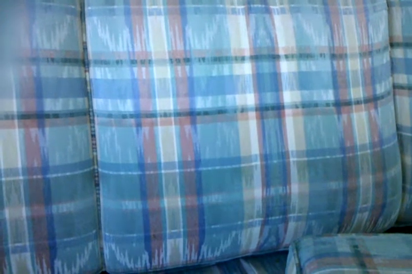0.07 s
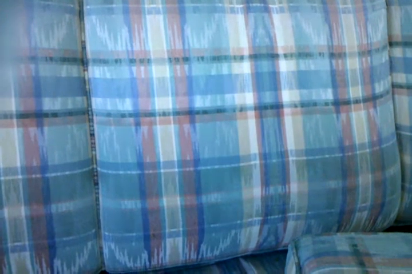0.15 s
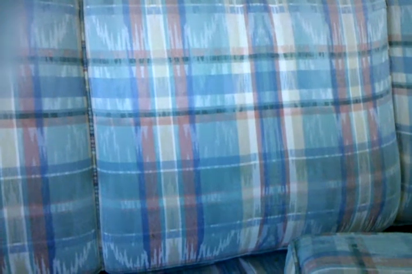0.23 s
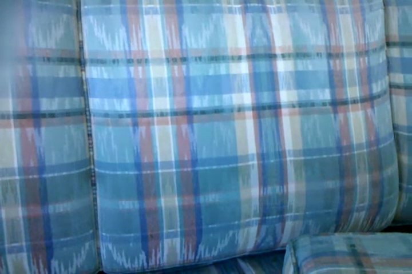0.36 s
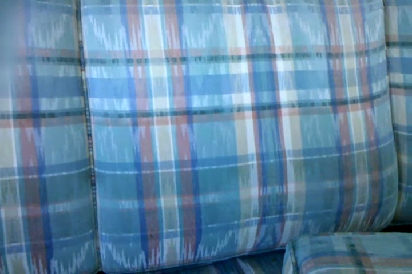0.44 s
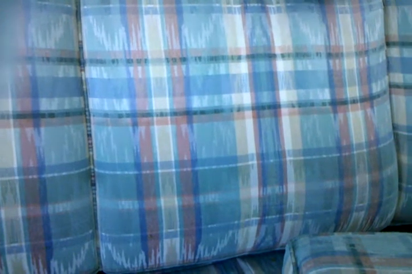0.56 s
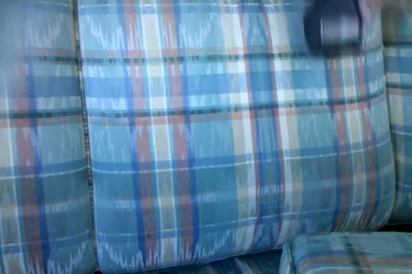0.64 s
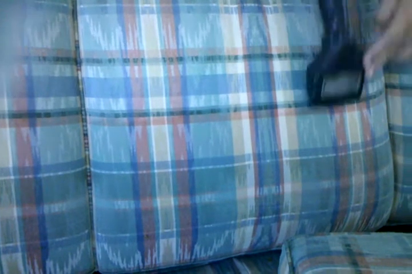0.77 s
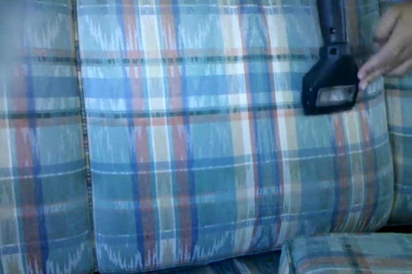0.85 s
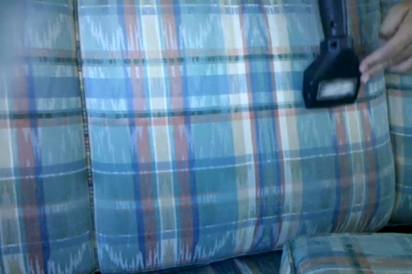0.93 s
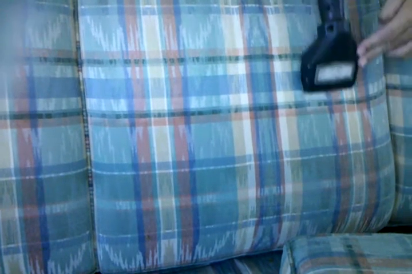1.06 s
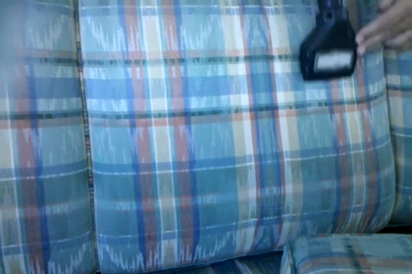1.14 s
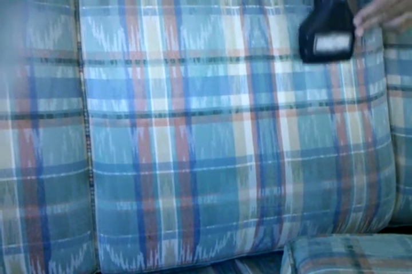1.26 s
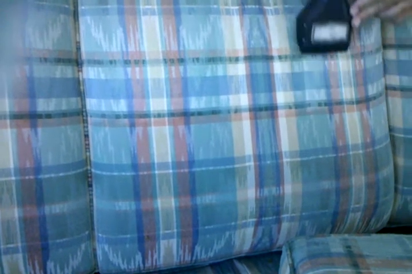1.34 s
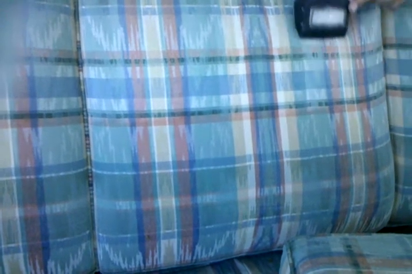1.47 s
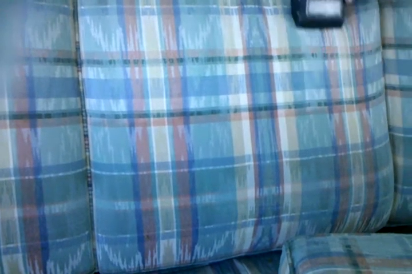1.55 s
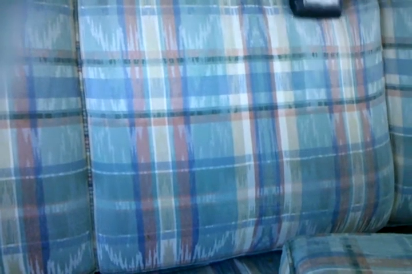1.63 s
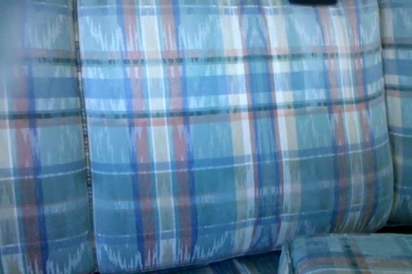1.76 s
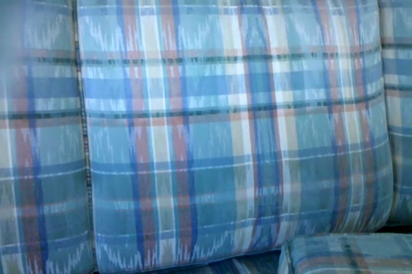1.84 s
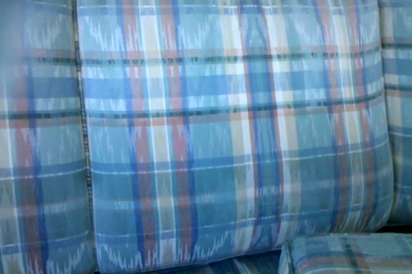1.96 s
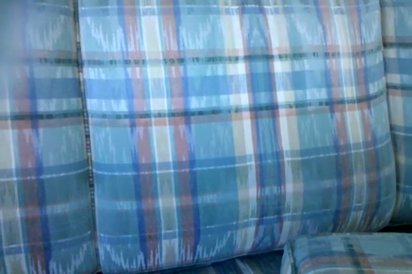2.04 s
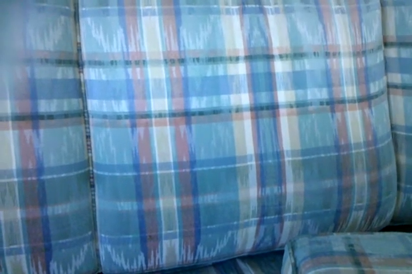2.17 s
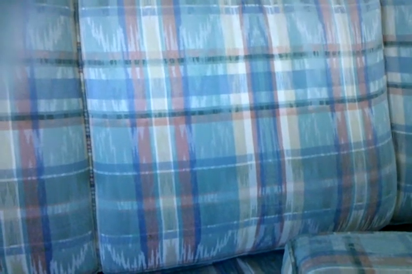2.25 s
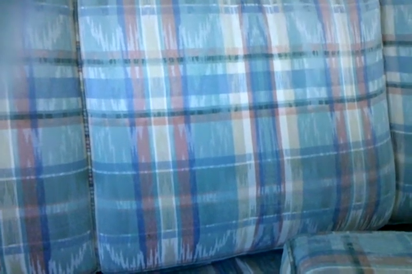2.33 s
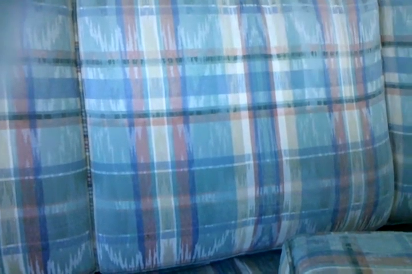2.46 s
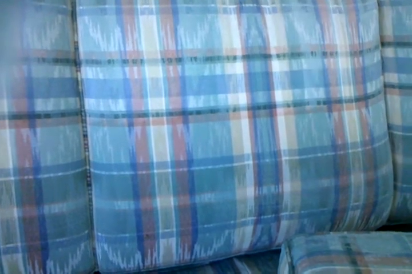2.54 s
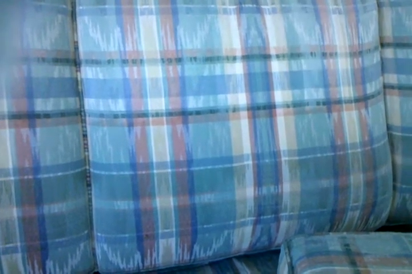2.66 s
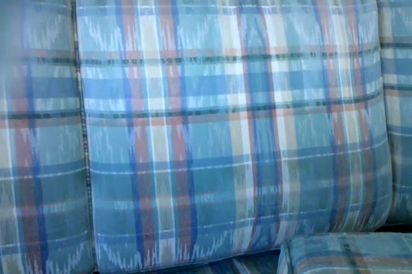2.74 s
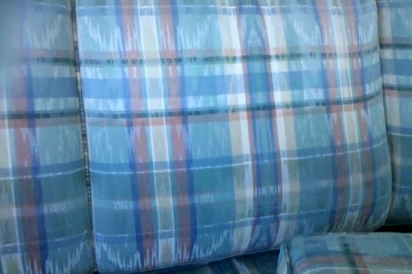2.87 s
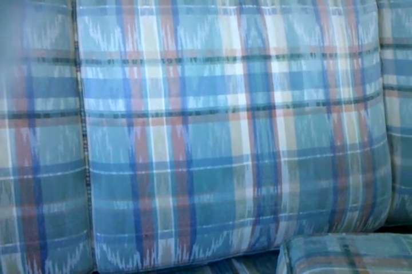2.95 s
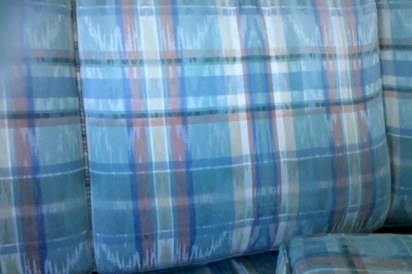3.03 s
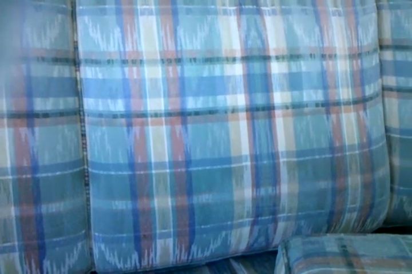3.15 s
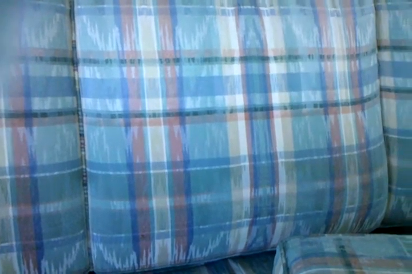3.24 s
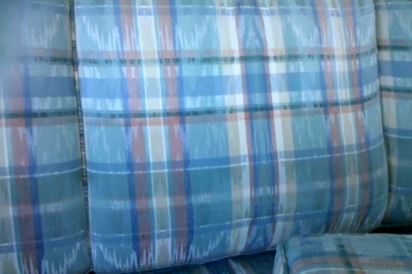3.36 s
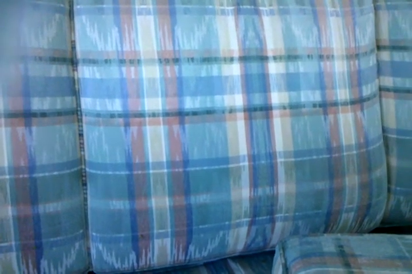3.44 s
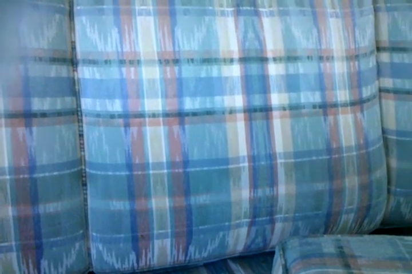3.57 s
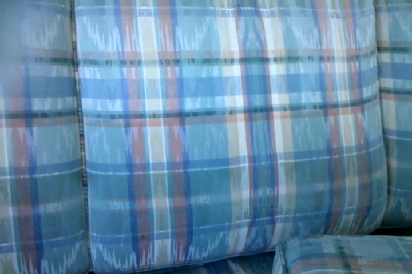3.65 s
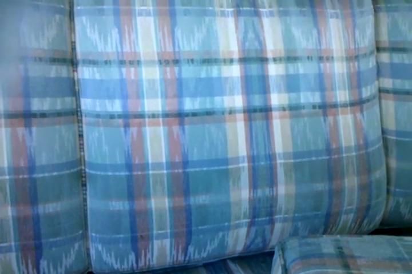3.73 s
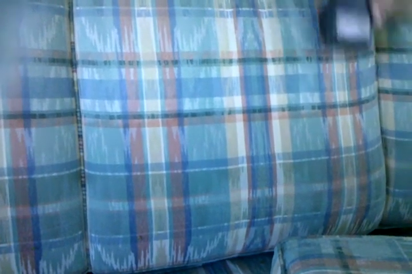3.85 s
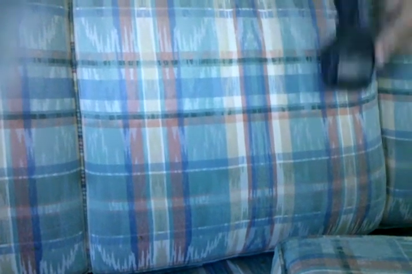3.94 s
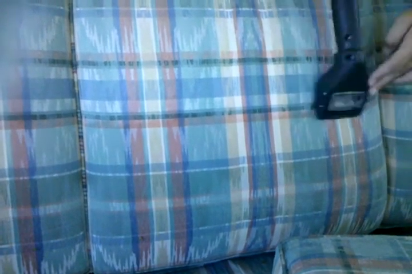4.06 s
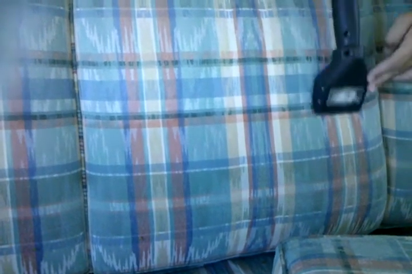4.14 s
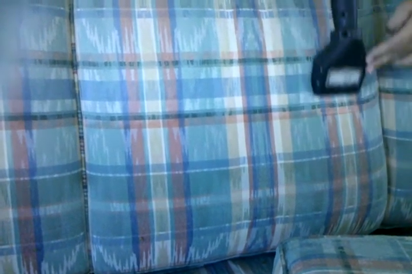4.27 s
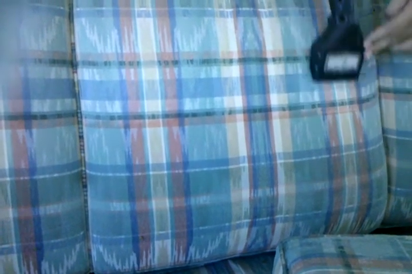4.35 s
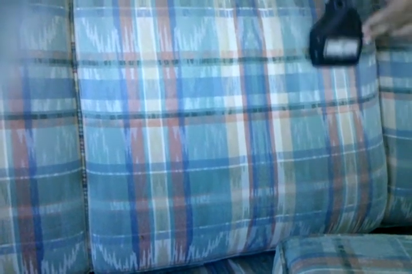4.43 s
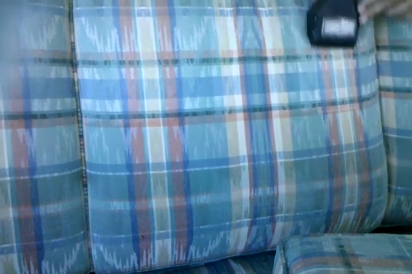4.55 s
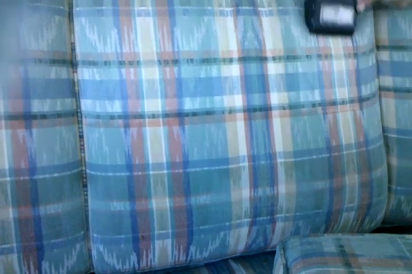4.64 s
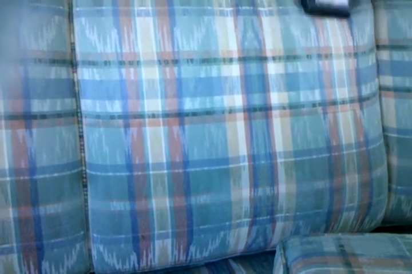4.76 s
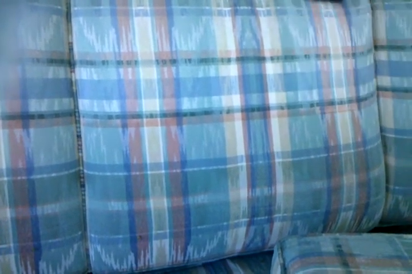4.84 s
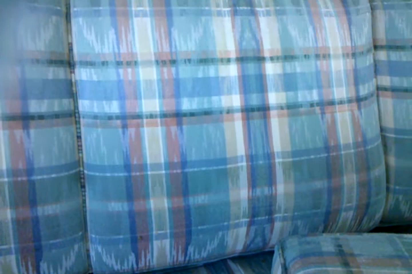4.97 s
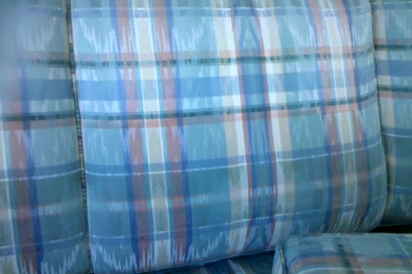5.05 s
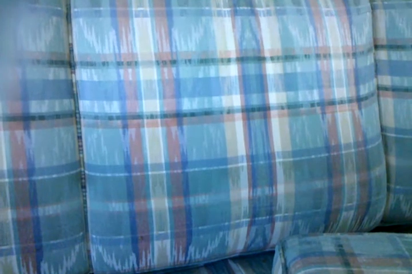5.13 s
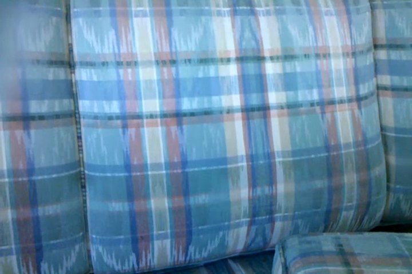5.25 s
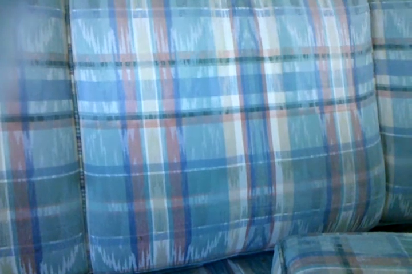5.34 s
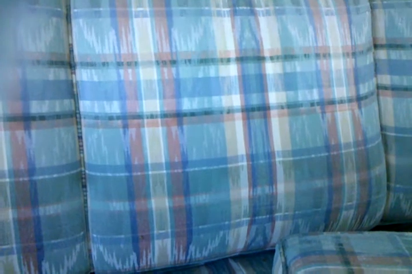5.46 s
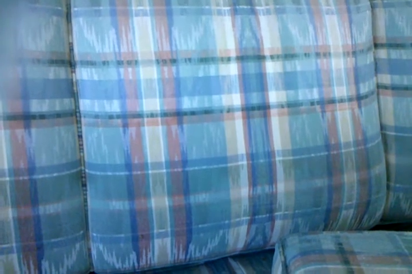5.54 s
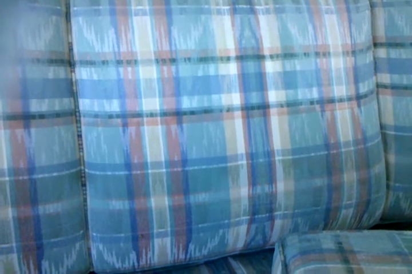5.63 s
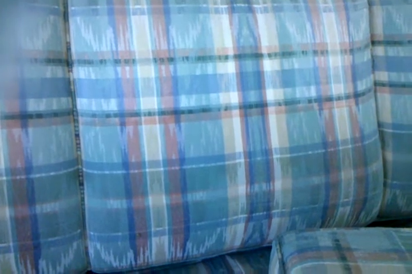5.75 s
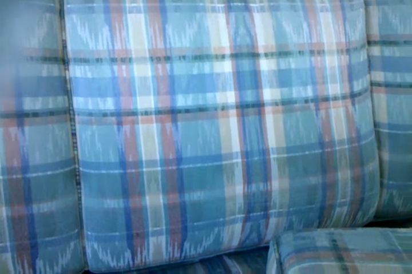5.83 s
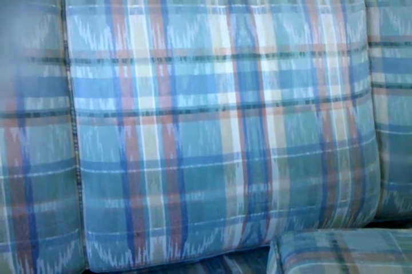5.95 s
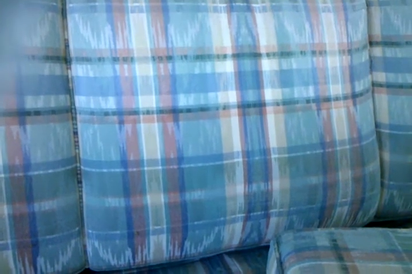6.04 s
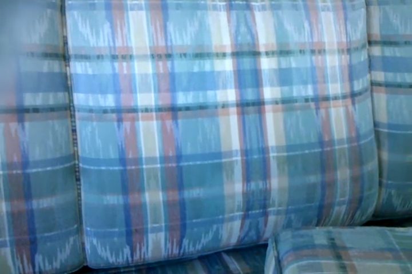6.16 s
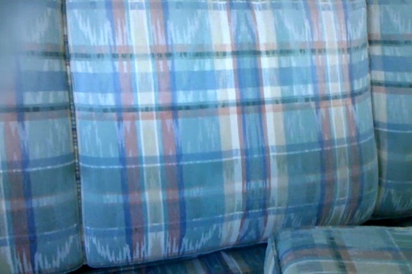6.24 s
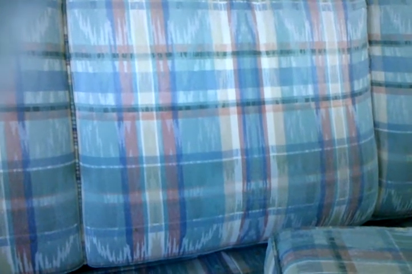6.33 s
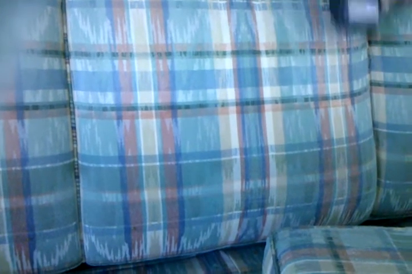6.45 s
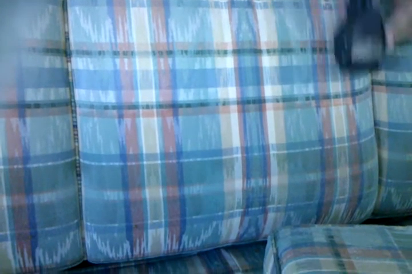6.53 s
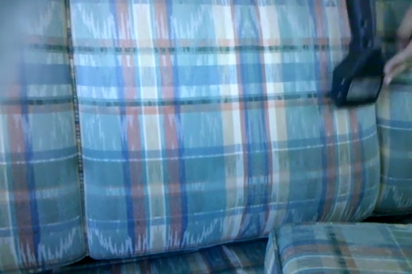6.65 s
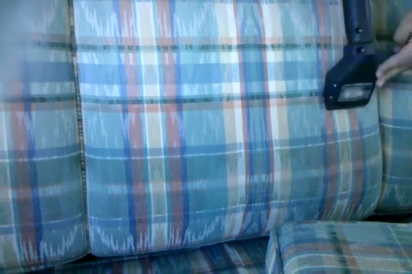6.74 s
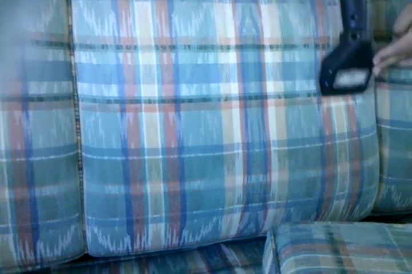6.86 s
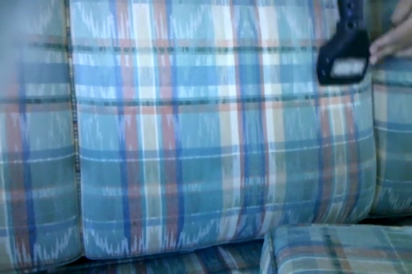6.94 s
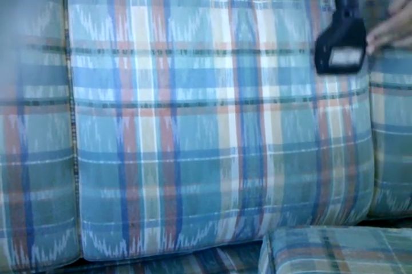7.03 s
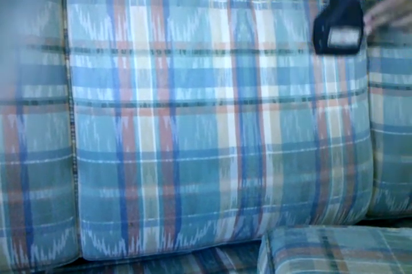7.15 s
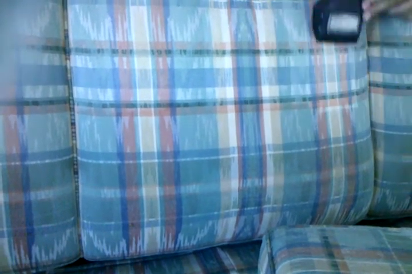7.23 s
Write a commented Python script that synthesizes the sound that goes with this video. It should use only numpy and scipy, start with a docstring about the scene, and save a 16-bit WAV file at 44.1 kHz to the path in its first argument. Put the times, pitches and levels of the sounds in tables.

```python
"""A hand-held upholstery cleaner is worked over a sofa cushion in three strokes, close to a mono microphone.
Each time the nozzle lifts, air gulps in, then turbulent air and spray roar through it; slugs of water slurp.
It seals again with a soft thud as the air column stops, and is drawn along with a thin suction hiss.
Pump and fan hum throughout, the motor speeding up slightly while the air flows freely."""
import sys
import numpy as np
from scipy import signal
from scipy.fft import rfft, irfft, next_fast_len
from scipy.io import wavfile
from scipy.ndimage import map_coordinates

SR = 44100
rng = np.random.default_rng(int(sys.argv[2]) if len(sys.argv) > 2 else 0)


def inscribe(sig):
    """Save sig as 16-bit PCM at rate SR to the path in sys.argv[1].

    A 1-D sig is mono; a 2-D sig holds one channel per row.
    Samples are clipped to [-1, 1] before scaling.
    """
    pcm = np.round(np.clip(np.atleast_2d(sig).T, -1, 1) * 32767)
    wavfile.write(sys.argv[1], SR, pcm.astype(np.int16))


N = 321657
TIME = np.arange(N) / SR

# Strokes: the nozzle lifts, swings toward the listener, seals, is drawn along and eases off.
# lift_s, swing_s, seal_s, rush_db, smack_db, push_db, draw_s, ease_s, hollow_growth_db_per_s
STROKES = [(0.180, 0.38, 1.081, -0.5, -12, -37, 1.14, 0.48, 15.5),
           (3.386, 3.63, 4.3155, 0.2, -10.5, -43, 0.83, 0.62, 19.5),
           (6.038, 6.175, 6.970, 0.6, -22, -52, 1.0, 0.6, 15.5)]
# Spectrum of water sucked into the nozzle: frequency_hz, level_db
WET_SPECTRUM = [(400, -39), (1800, -12), (3300, -3), (4200, -7.5), (5400, 8.5), (7000, -5)]
PEEL_S, SHUT_S = 0.048, 0.004  # the seal peels open over a moment and shuts almost at once


def gain_of(db):
    """Amplitude ratio of a level in decibels."""
    return 10 ** (np.asarray(db) / 20)


def unit_rms(x):
    """Normalisation to unit mean power."""
    return x / np.sqrt(np.mean(x ** 2) + 1e-20)


def since(s):
    """Seconds elapsed since a moment, zero before it."""
    return np.maximum(TIME - s, 0)


def swell(crest_s, half_s, db=0):
    """Gaussian envelope, down to 1/e at half_s either side of its crest."""
    return gain_of(db) * np.exp(-((TIME - crest_s) / half_s) ** 2)


def coloured(x, spectrum):
    """Zero-phase filtering by a spectrum interpolated over log frequency."""
    hz, db = np.transpose(spectrum)
    size = next_fast_len(N + 4096)
    curve_db = np.interp(np.log(np.fft.rfftfreq(size, 1 / SR) + 1), np.log(hz), db)
    return irfft(rfft(x, size) * gain_of(curve_db), size)[:N]


def noise(spectrum):
    """Spectrally shaped Gaussian noise of unit power."""
    return unit_rms(coloured(rng.standard_normal(N), spectrum))


def wander(rate_hz):
    """Random modulation: low-passed noise of unit power."""
    size = next_fast_len(N)
    hz = np.fft.rfftfreq(size, 1 / SR)
    spectrum = rfft(rng.standard_normal(size)) / (1 + (hz / rate_hz) ** 4)
    return unit_rms(irfft(spectrum, size)[:N])


def resonate(x, hz, width_hz, stages=1):
    """Damped resonance of unit gain per stage, centred on a steady or gliding frequency."""
    turn = np.exp(2j * np.pi * np.cumsum(hz * np.ones(N)) / SR)
    pole = np.exp(-np.pi * width_hz / SR)
    for _ in range(stages):
        x = 2 * (turn * signal.lfilter([1 - pole], [1, -pole], x / turn)).real
    return x


def cavity(modes):
    """Turbulence excites the normal modes of a cavity."""
    total = 0
    for hz, width_hz, db in modes:
        mode = resonate(rng.standard_normal(N), hz, 1.7 * width_hz, stages=2)  # cascading narrows it
        total += gain_of(db) * unit_rms(mode)
    return unit_rms(total)


def spatter(grain_db, surge_db):
    """Amplitude modulation: water breaks the air stream into fast grains and slower surges."""
    return unit_rms(gain_of(grain_db * wander(360) + surge_db * wander(24)))


def opening(lift_s, seal_s, rise_s):
    """The mouth as a valve, 0-1: it opens linearly and shuts exponentially."""
    return np.minimum(since(lift_s) / rise_s, 1) * np.exp(-since(seal_s) / SHUT_S)


def airflow():
    """Free flow follows the valve opening through all strokes, 0-1."""
    return sum(opening(lift_s, seal_s, PEEL_S) for lift_s, _, seal_s, *_ in STROKES)


def motor_and_fan():
    """Rotation gives tones whose pitch follows the airflow, lagged by inertia; fan turbulence rushes."""
    # Tones of motor and pump: pitch_hz, level_db
    motor_tones = [(46.4, -92.5), (70, -74.5), (92.7, -69.5), (116, -61), (118.4, -55), (140.4, -51),
                   (162, -63.5), (185.2, -51.5), (208.5, -69), (234, -61), (257, -61.5), (280, -63.5),
                   (302, -63), (327, -69.5), (349, -71.5), (370.4, -51.5), (417, -65.5)]
    # Spectrum of the fan: frequency_hz, level_db
    fan_spectrum = [(38, -55), (60, -13.5), (130, 0.5), (250, -5), (400, -6), (500, -2.5), (730, -1),
                    (880, -7.5), (1250, -7.5), (1480, -5), (1850, -6.5), (2300, -9.5), (3000, -13),
                    (7000, -9.5)]
    full_swing_percent, inertia_s = 4.7, 2.0
    flow = airflow()
    step = 1 / (inertia_s * SR)
    speed_percent = full_swing_percent * signal.lfilter([step], [1, step - 1], flow - flow.mean())
    clock = np.cumsum(1 + (speed_percent + 0.2 * wander(7.9)) / 100) / SR
    hum = 0
    for hz, db in motor_tones:
        waver_db = 0.6 + hz / 170  # higher tones waver more
        tone = np.sin(2 * np.pi * (hz * clock + rng.random()))
        hum += gain_of(db) * unit_rms(tone * gain_of(waver_db * wander(8.8)))
    return hum + gain_of(-45.0) * noise(fan_spectrum)


def open_nozzle():
    """Turbulent air and spray sound the mouth's resonances; the cushion's echo comb-filters them."""
    # Spectrum of the inrushing air: frequency_hz, level_db
    roar_spectrum = [(45, -48.5), (120, -32.5), (220, -0.5), (320, -8), (740, -4), (1000, -6.5), (1650, 1),
                     (2300, -0.5), (2850, 1), (3500, 4), (4100, -2.5), (5000, 5.5), (7000, -10)]
    # Spectrum of the spray: frequency_hz, level_db
    spray_spectrum = [(2500, -36.5), (4200, -4.5), (4900, -2), (5550, 4), (6000, 4.5), (6550, 6.5),
                      (7000, 4), (9000, -6.5)]
    # Turbulence driving the mouth's hollow tone: frequency_hz, level_db
    mouth_spectrum = [(500, -14.5), (740, -5), (860, -1), (1400, 0), (2200, -3.5)]
    # Resonances of the open nozzle: pitch_hz, width_hz, level_db
    nozzle_modes = [(873, 79, -3), (1061, 136, -3.5), (1350, 63, -4.5), (2110, 130, -3.5), (2557, 110, -3),
                    (3386, 510, 4)]
    air_lag_s, swing_width_s, approach_s, pinch_s = 0.022, 0.026, 0.18, 0.06
    low_hz, high_hz, fill_s = 820.0, 1180.0, 0.22  # the hollow tone rises as the wand fills with air
    contact_ms, contact_reflection = 0.4, 0.47

    spray, roar, hollow = np.zeros((3, N))
    mouth_hz, delay_ms = np.full(N, low_hz), np.full(N, contact_ms)
    for lift_s, swing_s, seal_s, rush_db, *_, growth_db_per_s in STROKES:
        age_s = np.minimum(since(lift_s), seal_s - lift_s)
        left_s = np.maximum(seal_s - TIME, 0)
        swung = 0.5 + 0.5 * np.tanh((TIME - swing_s) / (2 * swing_width_s))
        near = 1 - np.exp(-since(swing_s - swing_width_s) / approach_s)
        pinch = np.exp(-(left_s / pinch_s) ** 2)  # the narrowing gap speeds the air up
        inflow = opening(lift_s + air_lag_s, seal_s, rise_s=0.034)
        spray += opening(lift_s, seal_s, PEEL_S) * gain_of(rush_db - 26.5 + 9.4 * swung + 2.2 * pinch)
        roar += inflow * gain_of(rush_db - 34.2 + 11.2 * near + 2.0 * pinch)
        hollow += inflow * gain_of(rush_db - 31.2 - 5.6 * swung + growth_db_per_s * age_s) * (1 - pinch)
        rising_hz = high_hz + (low_hz - high_hz) * np.exp(-age_s / fill_s)
        mouth_hz = np.where(age_s > 0, rising_hz, mouth_hz)
        # the echo path shortens as the cushion comes near
        delay_ms = np.where(age_s > 0, contact_ms + 1.1 * left_s ** 0.7, delay_ms)

    mouth = unit_rms(resonate(noise(mouth_spectrum), mouth_hz, width_hz=430, stages=2))
    air = roar * (gain_of(2.0) * noise(roar_spectrum) + gain_of(-5.0) * cavity(nozzle_modes))
    air += gain_of(-5.5) * hollow * mouth * spatter(grain_db=0.3, surge_db=2.1)
    jet = (air + spray * noise(spray_spectrum)) * spatter(grain_db=0.47, surge_db=0.6)
    throb_hz = 15.5 + 1.59 * wander(4.14)  # water shudders in the hose
    throb = np.sin(2 * np.pi * np.cumsum(throb_hz) / SR)
    jet *= gain_of(0.7 * throb + 0.6 * wander(7))
    delay_ms *= 1 + 0.04 * wander(6)  # the hand is unsteady
    echo = map_coordinates(jet, [np.arange(N) - delay_ms * SR / 1000], order=3)
    return jet - contact_reflection * contact_ms / delay_ms * echo


def gulps():
    """Pressure equalisation: air gulps into the emptied wand just after the seal breaks."""
    # Spectrum of the gulp: frequency_hz, level_db
    gulp_spectrum = [(300, -17.5), (470, -1.5), (600, -4.5), (850, -0.5), (1400, -3.5), (1900, -5),
                     (2600, -16)]
    envelope = sum(swell(lift_s + 0.052, half_s=0.016, db=-30) for lift_s, *_ in STROKES)
    return envelope * noise(gulp_spectrum)


def slurps():
    """Two-phase flow: each slug of water gives a swell of grainy hiss around its own resonance."""
    # Slugs of water sucked in: crest_s, level_db, half_length_s, pitch_hz
    slugs = [(0.585, -20, 0.04, 6300), (2.661, -29.5, 0.011, 4600), (2.829, -40.5, 0.0092, 5600),
             (3.74, -22, 0.03, 6400), (4.11, -20.5, 0.045, 6400), (5.494, -36, .011, 6000),
             (5.569, -35.5, 0.014, 3400), (5.693, -39, 0.017, 5600), (6.609, -18, 0.012, 6500),
             (6.678, -17.5, .025, 5400), (6.79, -21, .05, 5800)]
    grain = spatter(grain_db=2.5, surge_db=0.5)
    hiss, turbulence = noise(WET_SPECTRUM), rng.standard_normal(N)
    water = 0
    for crest_s, db, half_s, hz in slugs:
        ring = unit_rms(resonate(turbulence, hz, width_hz=900))
        water += swell(crest_s, half_s, db) * (gain_of(-3) * hiss + gain_of(-4) * ring)
    return grain * water


def damped_tone(age_s, hz, rise_s):
    """Transient response of a resonator, its envelope peaking at rise_s."""
    return np.sin(2 * np.pi * hz * age_s) * age_s / rise_s * np.exp(1 - age_s / rise_s)


def seal_thuds():
    """Stopping the air column makes a pressure transient: a wet smack and three damped tones."""
    smack, knock = np.zeros((2, N))
    for _, _, seal_s, _, smack_db, push_db, *_ in STROKES:
        age_s = since(seal_s)
        smack += gain_of(smack_db) * (age_s > 0) * np.exp(-age_s / 0.002)
        knock += gain_of(smack_db + 9.5) * damped_tone(age_s, hz=5200, rise_s=0.00025)  # snap
        knock += gain_of(-23.5) * damped_tone(age_s, hz=238, rise_s=0.0026)  # thud in the wand
        knock += gain_of(push_db) * damped_tone(age_s, hz=90, rise_s=0.005)  # push into the cushion
    return smack * noise(WET_SPECTRUM) + knock


def sealed_nozzle():
    """Flow noise: air forced through the weave and under the rim hisses and excites the wand's modes."""
    # Spectrum of the suction hiss: frequency_hz, level_db
    suction_spectrum = [(1500, -25), (3000, -12), (3600, -12.5), (4300, -6.5), (5000, 2), (5600, 2.5),
                        (6200, 2), (6800, 3), (9000, -6.5)]
    # Spectrum of air passing through the cloth: frequency_hz, level_db
    weave_spectrum = [(300, -47), (900, -9), (1400, -11.5), (1850, -9.5), (2400, -10.5), (3050, 0.5),
                      (3600, 3), (4400, 2), (5500, -2.5), (7000, -14)]
    # Resonances of the sealed wand: pitch_hz, width_hz, level_db
    wand_modes = [(1118, 190, -3.5), (1730, 100, -10.5), (3630, 190, -4), (3900, 160, -4), (5000, 370, 0),
                  (6580, 380, 3)]
    settle_db, settle_s, let_go_s = 5.5, 0.07, 0.07

    eased, released = np.ones((2, N))
    loose, edge, leak = np.zeros((3, N))
    for _, _, seal_s, _, _, _, draw_s, ease_s, _ in STROKES:
        down, end_s = TIME > seal_s, seal_s + draw_s
        loose += down * np.exp(-since(seal_s) / settle_s)  # extra air until the cloth is sucked tight
        # after the draw the flow eases slowly, while the weave lets go quickly
        eased = np.where(down, 1 - np.exp(-since(end_s) / ease_s), eased)
        released = np.where(down, 1 - np.exp(-since(end_s) / let_go_s), released)
        # the rim leaks as it crosses the cushion's edge
        edge += swell(end_s - 0.16, half_s=0.24)
        leak += swell(end_s, half_s=0.33)

    suction = gain_of(-33.1 - 14.0 * eased - 2.8 * released + 0.3 * settle_db * loose + 0.6 * edge)
    weave = gain_of(-38.2 - 10 * eased - 8.5 * released + settle_db * loose)
    hiss = gain_of(2.7) * suction * noise(suction_spectrum)
    hiss += gain_of(2.3) * weave * noise(weave_spectrum)
    hiss *= gain_of(1.5 * eased * wander(14))  # at rest, water flutters in the mouth
    singing = gain_of(-47.0 + 5.5 * leak) * cavity(wand_modes)
    return (1 - airflow()) * (hiss + singing) * spatter(grain_db=0.5, surge_db=0.5)


def room(x, t60_s, wet_db):
    """Diffuse reverberation: soft furnishings absorb the reflections in a short exponential tail."""
    t = np.arange(SR // 2) / SR
    tail = rng.standard_normal(len(t)) * gain_of(-60 * t / t60_s) * (t > 0.004)
    return x + gain_of(wet_db) * signal.fftconvolve(x, tail / np.linalg.norm(tail))[:N]


def scene():
    """Superposition of the reverberant nozzle and the machine's hum, alike in both channels."""
    nozzle = open_nozzle() + sealed_nozzle() + slurps() + seal_thuds() + gulps()
    mono = room(nozzle, t60_s=0.16, wet_db=-12) + motor_and_fan()
    return np.array([mono, mono])


def record(dry):
    """Band limiting and clipping: a narrow-band microphone flattens the top peaks, then a low-pass."""
    # Response of the microphone: frequency_hz, gain_db
    microphone_response = [(25, -19), (60, 0), (6850, 0), (7200, -6.5), (7600, -19.5), (8000, -29.5),
                           (8850, -25), (9400, -60.5)]
    clip_level, cutoff_hz = 0.72, 15650
    heard = np.array([coloured(channel, microphone_response) for channel in dry])
    heard = np.clip(heard, -clip_level, clip_level)
    low_pass = signal.firwin(511, cutoff_hz, window=("kaiser", 9), fs=SR)
    return signal.oaconvolve(heard, low_pass[None], "same")


dry = scene()
out = record(dry)
inscribe(out)
```